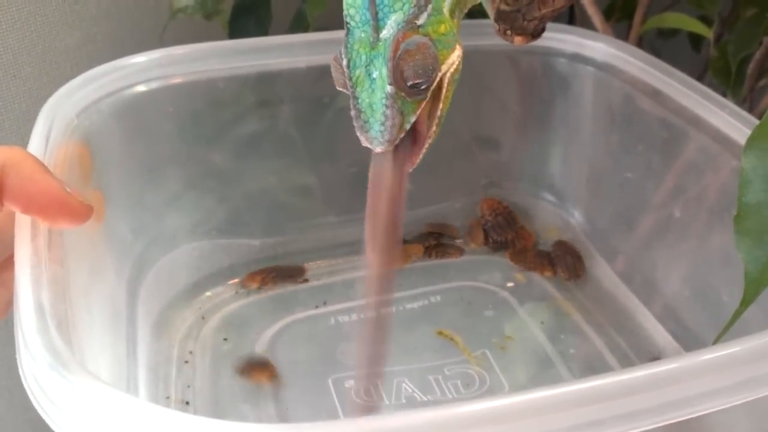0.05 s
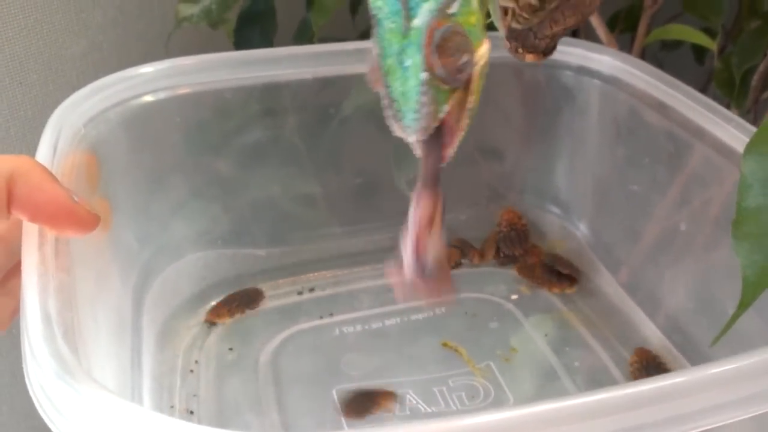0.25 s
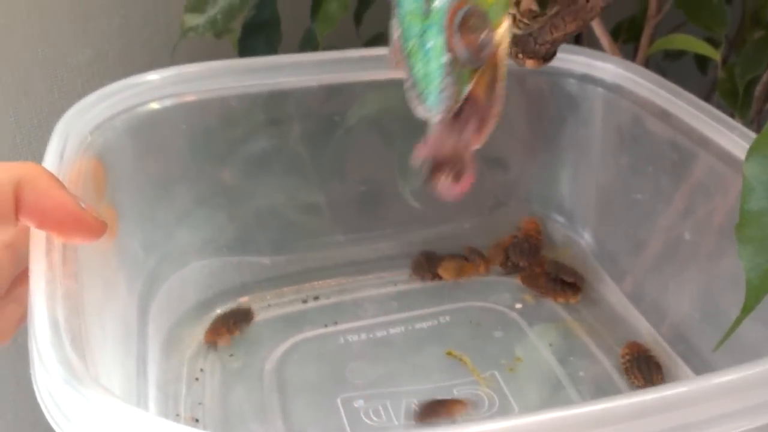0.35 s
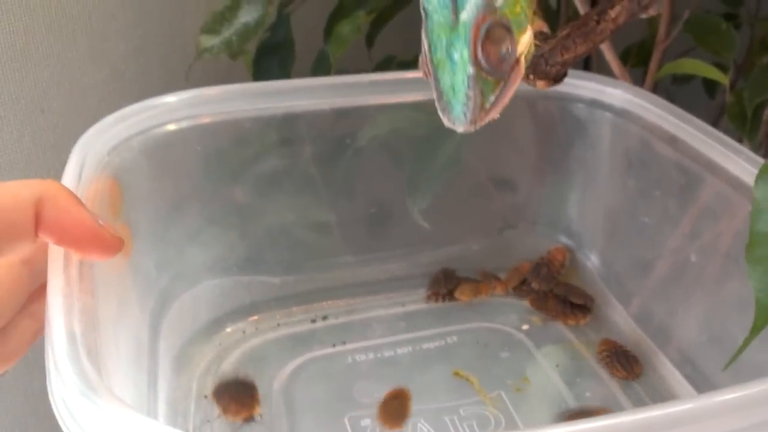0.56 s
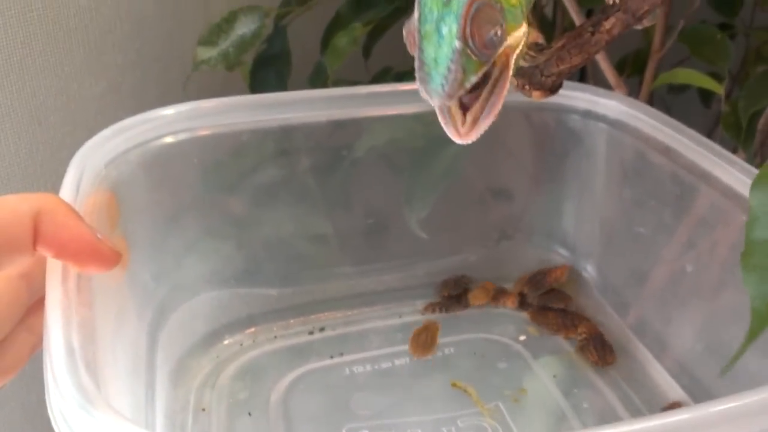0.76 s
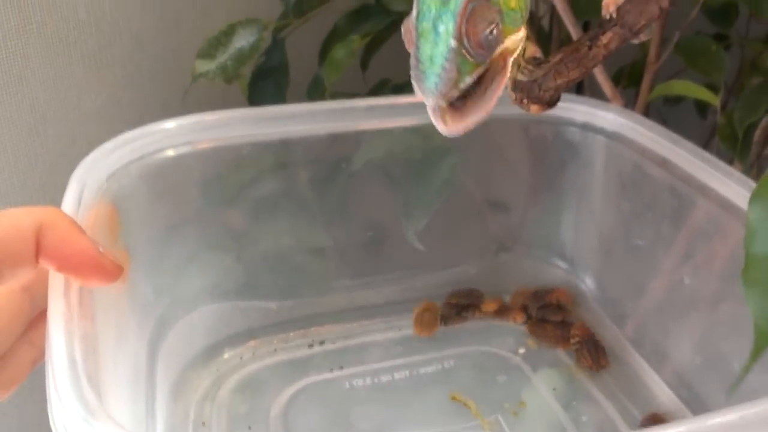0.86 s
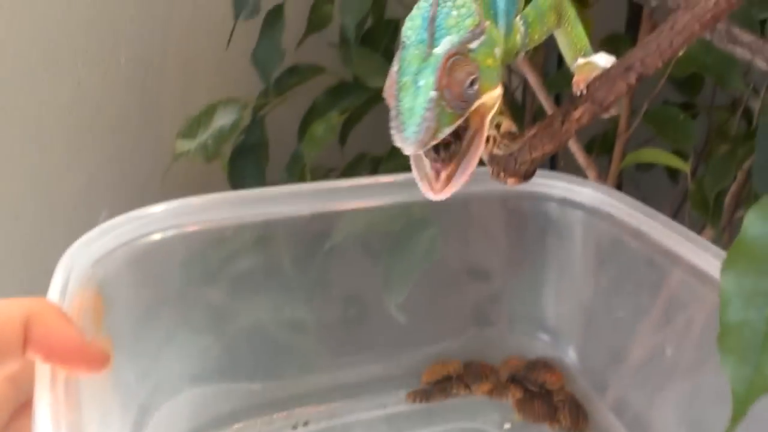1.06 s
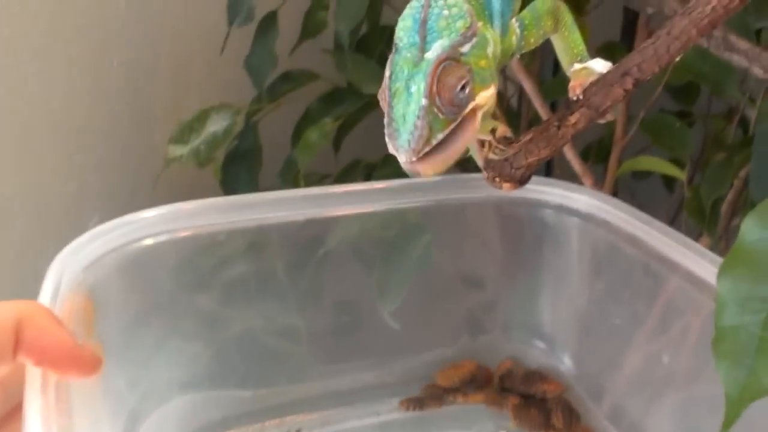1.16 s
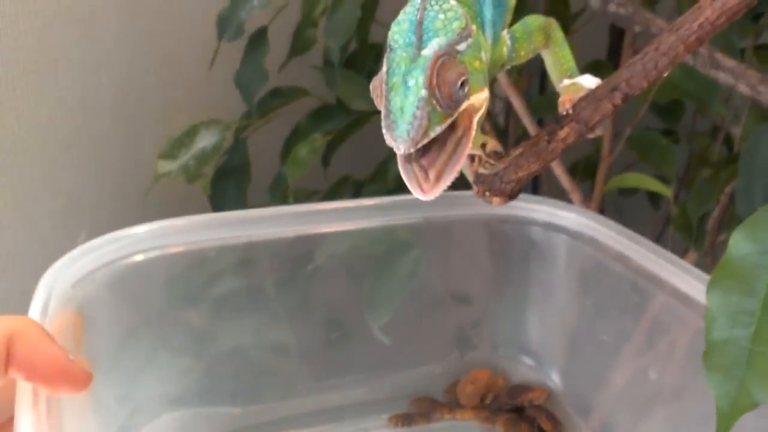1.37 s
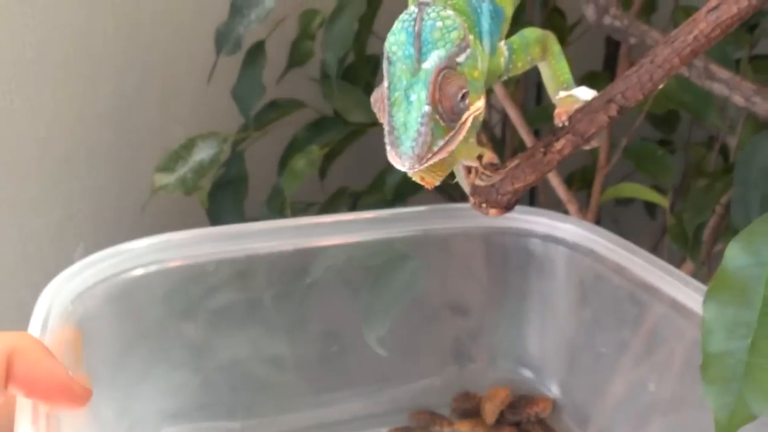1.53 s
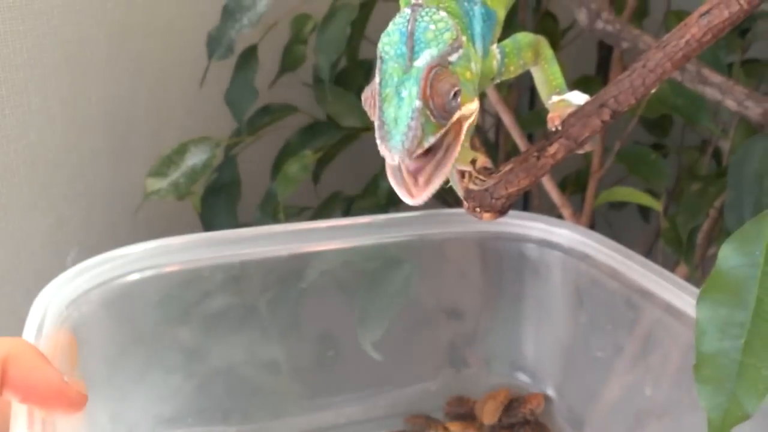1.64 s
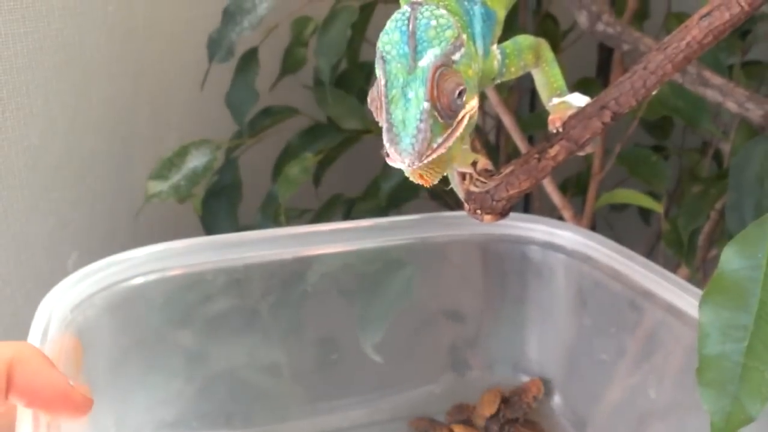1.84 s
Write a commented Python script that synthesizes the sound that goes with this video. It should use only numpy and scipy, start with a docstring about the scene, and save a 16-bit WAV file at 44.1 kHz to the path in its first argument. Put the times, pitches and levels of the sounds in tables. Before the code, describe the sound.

A sharp, wet smack comes at about 0.25 seconds as a chameleon's tongue hits a plastic tub close by, making it ring briefly. Soft, dull bumps on the tub follow, mostly around 0.7 to 1 second and again after 1.5 seconds. Insects scratch lightly on the plastic inside until the end, near 2 seconds. Throughout, faint crickets chirp high and fast over a quiet hum, rumble and hiss.

```python
"""A wet smack close to the microphone: a chameleon's tongue touches a hand-held plastic tub, lands
its full slap, and the tub rings. Soft bumps on the tub follow, and feeder insects scratch about
inside, their legs catching and slipping on the plastic. Farther off, two crickets chirp faintly,
wing scraping wing, over a low hum, rumble and hiss. Nearby walls answer briefly."""
import sys
import numpy as np
from scipy import signal
from scipy.fft import rfft, irfft, next_fast_len
from scipy.io import wavfile
from scipy.ndimage import map_coordinates

SR = 44100
rng = np.random.default_rng(int(sys.argv[2]) if len(sys.argv) > 2 else 0)


def wav_record(signal):
    """Record a signal, one row per channel, as 16-bit PCM in the file named by sys.argv[1]."""
    frames = np.transpose(np.atleast_2d(signal))
    bounded = np.clip(frames, -1, 1)
    # unit amplitude maps onto the largest positive 16-bit level
    quanta = np.round(bounded * 32767).astype(np.int16)
    wavfile.write(sys.argv[1], SR, quanta)


N = 83790

# the plastic tub's modes: f/Hz, level/dB, t60/s, left over right/dB
TUB_MODES = [(95.8, 1, 0.16, -8.5), (142.8, -6, 0.21, -4), (287.3, -10.5, 0.23, 3), (369, -11, 0.19, -4),
             (501.5, -1.5, 0.085, -4), (587, -2.5, .13, -3), (837, -6.5, 0.097, -2),
             (1017, -13, 0.072, -31), (1233, -11, 0.1, 10), (1360, 0, 0.065, -2), (2260, -11, 0.083, 0),
             (2970, -3.5, .1, -11), (3790, -4.5, 0.12, 9), (7560, -14, 0.033, 2)]
# stereo width of splats and knocks on the tub: f/Hz, side over mid/dB
TUB_WIDTH = [(100, -17), (500, -11), (1150, 1), (2200, -11.5), (4500, -21.5), (9500, -11.5)]
# stereo width of the background and the insects' crackle: f/Hz, side over mid/dB
AIR_WIDTH = [(60, -2), (340, -11), (1060, -1.5), (3300, -5), (10500, -2.5)]
ROOM_DB, CLICK_RISE_S = -4, 0.00033  # the walls' answer to the tub; attack of a sharp contact


def tongue():
    """Close up, the tip touches, slaps down and splats; the hardest contact rings the tub."""
    # the tongue's contacts: t/s, level/dB
    contacts = [(.2420, -6), (.2446, 0), (.2508, -9), (.2622, -16)]
    # modes of the struck patch of tub floor, quickly damped by the tongue: f/Hz, level/dB, t60/s
    patch_modes = [(1283, -18, 0.027), (3775, -7.5, 0.0053)]
    # spectrum of the splat: f/Hz, level/dB
    splat_spectrum = [(120, -3.5), (215, -17), (320, 1.5), (520, -4.5), (720, -8.5), (880, -3), (1250, -8),
                      (1750, -5), (2150, 1.5), (2700, -1.5), (3100, -5), (3850, -1.5), (4600, -5),
                      (5300, -17.5), (6300, -5.5), (6950, -33), (7600, -6.5), (8200, -20), (10500, -18)]
    # spectrum of the bright, wet click of first touch: f/Hz, level/dB
    click_spectrum = [(1500, -7.5), (5500, -2), (10500, -15.5)]
    ring_db, splat_db, click_db, wet_t60_s = -28.5, -18.5, -26.5, 0.029
    touch_s = contacts[0][0]
    slap_s = max(contacts, key=lambda row: row[1])[0]
    ring = sum(amp(ring_db + db) * pan(balance) * mode(slap_s, hz, rise=0.0039, t60=t60)
               for hz, db, t60, balance in TUB_MODES)
    patch = sum(amp(db) * mode(slap_s, hz, rise=0.00028, t60=t60) for hz, db, t60 in patch_modes)
    splat_envelope = sum(amp(splat_db + db) * burst(s, CLICK_RISE_S, wet_t60_s) for s, db in contacts)
    splat = noise(splat_spectrum, TUB_WIDTH) * splat_envelope
    click = amp(click_db) * noise(click_spectrum, TUB_WIDTH) * burst(touch_s, CLICK_RISE_S, wet_t60_s)
    return ring + patch + splat + click + amp(ROOM_DB) * room(splat + click)


def tub_bumps():
    """Each bump is a dull tap and a new mix of the tub's modes; a light rustle runs beneath."""
    # soft bumps on the tub: t/s, low ring level/dB, tap level/dB
    bumps = [(0.166, -51.5, -52), (0.348, -68, -48.5), (.532, -56, -56.5), (0.573, -76, -53.5),
             (.671, -60, -51), (0.737, -46, -52), (.774, -42, -49), (.802, -60, -63.5), (.836, -56.5, -56),
             (.897, -74, -55), (0.95, -84, -59), (1.04, -61.5, -50.5), (1.535, -58.5, -52),
             (1.651, -56.5, -57), (1.731, -54.5, -50.5)]
    # spectrum of the taps and the rustle: f/Hz, level/dB
    tap_spectrum = [(400, -12), (700, -8.5), (870, 0.5), (1020, -8.5), (1250, -2), (1550, -11), (1850, -7),
                    (3000, -23.5)]
    # soft rustle in the tub: t/s, level/dB
    rustle_levels = [(0, -71.5), (.6, -81.5), (.8, -74), (1.05, -71), (1.2, -80.5), (1.5, -83), (1.7, -76),
                     (1.9, -74)]
    thud_hz, tap_hz, rise_s = 385.3, 974, 0.0018

    def reach(hz, thud_db, tap_db):
        """How hard a bump drives a mode: its thud reaches the low ones, its tap the middle ones."""
        low = amp(thud_db + 5.5) * bell(hz, thud_hz, octaves=0.24)
        middle = amp(tap_db + 4) * bell(hz, tap_hz, octaves=0.25)
        return low + middle

    rings = sum(amp(db + 2 * rng.standard_normal()) * reach(hz, thud_db, tap_db) * mode(s, hz, rise_s, t60)
                for s, thud_db, tap_db in bumps
                for hz, db, t60, _ in TUB_MODES if thud_hz / 2 < hz < 2 * tap_hz)
    rustle = amp(np.interp(clock(), *np.transpose(rustle_levels)) + 2.4 * wobble(66))
    taps = sum(amp(db - 1) * burst(s, rise_s, t60=0.039) for s, _, db in bumps)
    knocks = noise(tap_spectrum, TUB_WIDTH) * (rustle + taps)
    return rings + knocks + amp(ROOM_DB) * room(knocks)


def insects():
    """Inside the tub, legs catch and slip on plastic: a few pitched scratches among faint ticks."""
    # leg scratches: t/s, level/dB, f/Hz, fine crackle level/dB
    scratches = [(0.046, -83, 3000, -60), (.352, -53.5, 3840, -54), (.671, -58, 4100, -67),
                 (.778, -61, 2350, -81), (.822, -59.5, 2360, -80.5), (.853, -59.5, 2690, -83),
                 (.931, -64, 3810, -53), (0.959, -63, 2960, -50), (1.075, -56, 3970, -56),
                 (1.203, -56, 3040, -58), (1.331, -56, 3760, -62), (1.611, -50, 2890, -52.5),
                 (1.651, -53.5, 2800, -79), (1.713, -59, 3670, -56.5), (1.733, -57, 2500, -80),
                 (1.849, -53, 3150, -67)]
    # spectrum of the crackle and ticks: f/Hz, level/dB
    crackle_spectrum = [(1200, -29), (3000, 11), (5000, -19), (8000, 2), (10500, -17.5)]
    steps_per_s, step_db = 25, -67
    stroke = lambda s: burst(s, rise=0.0027, t60=0.052)
    scrape = lambda pitch: unit(filtered(rng.standard_normal(N), lambda hz: bell(hz, pitch, 0.18)))
    pitched = sum(amp(db) * stroke(s) * scrape(pitch) for s, db, pitch, _ in scratches)
    crackle = sum(amp(db) * stroke(s) for s, _, _, db in scratches)
    steps = (rng.random(N) < steps_per_s / SR) * amp(step_db + 3 * rng.standard_normal(N))
    ticks = signal.fftconvolve(steps, burst(0, CLICK_RISE_S, t60=0.03))[:N]
    legs = pitched + (crackle + ticks) * noise(crackle_spectrum, AIR_WIDTH)
    legs *= unit(amp(2.1 * wobble(500)))  # a fast flicker roughens the level
    return legs + amp(ROOM_DB) * room(legs)


def crickets():
    """The nearer cricket chirps in three wing strokes; the farther is lower, slower and blurred."""
    # the nearer cricket's chirps: t/s of the main stroke, level/dB
    chirps = [(.046, 2), (0.147, 1), (0.252, 0), (.354, 3), (.456, -4), (.557, 0.5), (0.659, -4),
              (0.758, -4.5), (0.853, -1), (0.954, -2), (1.061, 0), (1.163, -2), (1.265, -2.5), (1.369, 0),
              (1.474, -2), (1.572, -1), (1.669, -0.5), (1.774, -1.5), (1.879, -2)]
    # wing strokes of one chirp: t/s from the main one, level/dB, half-length/s
    wing_strokes = [(-.017, -6, 0.0027), (0, -1, 0.0021), (0.013, -13, 0.0046)]
    near_hz, near_db = 6226, -50
    far_hz, far_db, far_period_s = 5450, -68, 0.1125
    t = clock()
    swell = lambda s, half: np.exp(-.5 * ((t - s) / half) ** 2)
    near_chirps = sum(amp(db + stroke_db) * swell(s + lag, half)
                      for s, db in chirps for lag, stroke_db, half in wing_strokes)
    far_chirps = sum(swell(s, half=0.012) for s in np.arange(0.046, t[-1], far_period_s))
    near = amp(near_db) * near_chirps * rasp(near_hz)
    far = amp(far_db) * far_chirps * rasp(far_hz)
    return near + far + amp(-1) * room(near + far)


def rasp(hz, spread_hz=180):
    """A tone of rms 1 whose pitch jitters as one wing scrapes the other."""
    pitch = hz + spread_hz * wobble(800)
    return unit(np.sin(2 * np.pi * np.cumsum(pitch) / SR))


def background():
    """Room tone: steady soft hiss, a low rumble and a wavering hum to the microphone's right."""
    # spectrum of the hiss: f/Hz, level/dB
    hiss_spectrum = [(25, -9.5), (55, 8), (100, -3), (190, -8.5), (290, -6), (370, -8.5), (450, -8.5),
                     (700, -13.5), (860, -13.5), (1000, -14), (1600, -20), (2900, -18), (4800, -21.5),
                     (7000, -20), (10500, -24.5)]
    # spectrum of the rumble: f/Hz, level/dB
    rumble_spectrum = [(25, -17), (45, -27), (60, 20.5), (80, -4), (110, 19.5), (170, -43)]
    # the hum's rise and fall: t/s, level/dB
    hum_levels = [(0, -66.5), (.55, -64), (0.851, -67), (1.2, -65.5), (1.36, -80), (1.55, -69.5),
                  (1.852, -61)]
    hum_hz, hiss_db, rumble_db = 121, -60.5, -59.5
    hum_db = np.interp(clock(), *np.transpose(hum_levels)) + 2 * wobble(11.68)
    hum = amp(hum_db) * unit(np.sin(2 * np.pi * hum_hz * clock() + 0.53 * wobble(7.8)))
    hiss = amp(hiss_db) * noise(hiss_spectrum, AIR_WIDTH)
    rumble = amp(rumble_db) * noise(rumble_spectrum, AIR_WIDTH)
    return hiss + rumble + pan(-5.5) * hum


def room(x, delay_s=0.005):
    """The short answer of nearby walls; each frequency dies at its own speed."""
    # the room's decay: f/Hz, t60/s
    decay_times = [(100, 0.48), (700, 0.27), (2500, 0.22), (9000, 0.17)]
    # stereo width of the reflections: f/Hz, side over mid/dB
    room_width = [(100, -20), (1100, -24), (3500, -15), (10000, -10.5)]
    white = noise([(20, 0), (20000, 0)], room_width)[:, :SR // 2]
    hz, t, bands = signal.stft(white, SR, nperseg=256)
    decay = np.exp(-np.log(1000) * t / along(decay_times, hz)[:, None])
    tail = signal.istft(bands * decay, SR, nperseg=256)[1]
    tail = np.pad(tail / np.linalg.norm(tail[0]), ((0, 0), (int(delay_s * SR), 0)))
    return signal.fftconvolve(np.atleast_2d(x), tail, axes=1)[:, :N]


def amp(db):
    """Decibels to gain."""
    return 10 ** (np.asarray(db) / 20)


def unit(x):
    """Scale to rms 1."""
    return x / np.sqrt(np.mean(x ** 2) + 1e-20)


def along(points, hz):
    """Interpolate (f/Hz, value) points on a log frequency axis."""
    f, v = np.transpose(points)
    return np.interp(np.log(hz + 1), np.log(f + 1), v)


def bell(hz, centre_hz, octaves):
    """A smooth peak around one frequency."""
    return np.exp(-.5 * (np.log2((hz + 1) / centre_hz) / octaves) ** 2)


def clock():
    """The time of every sample in seconds."""
    return np.arange(N) / SR


def wobble(rate):
    """A smooth random curve, rate knots a second."""
    return map_coordinates(rng.standard_normal(int(N * rate / SR) + 4), [clock() * rate])


def filtered(x, response):
    """Filter x by a gain given as a function of frequency."""
    size = next_fast_len(N + SR // 2)
    return irfft(rfft(x, size) * response(np.fft.rfftfreq(size, 1 / SR)), size)[..., :N]


def noise(spectrum, width):
    """Coloured stereo noise of rms 1."""
    mid, side = filtered(rng.standard_normal((2, N)), lambda hz: amp(along(spectrum, hz)))
    side = filtered(side, lambda hz: amp(along(width, hz)))
    return unit(np.array([mid + side, mid - side]))


def pan(db):
    """Channel gains that put left db above right."""
    return amp(np.array([[db], [-db]]) / 2)


def burst(s, rise, t60):
    """An envelope that rises at time s and dies away."""
    t = np.maximum(clock() - s, 0)
    return (1 - np.exp(-t / rise)) * np.exp(-np.log(1000) * t / t60)


def mode(s, hz, rise, t60):
    """One damped vibration set off at time s."""
    return burst(s, rise, t60) * np.sin(2 * np.pi * hz * (clock() - s))


def scene():
    """Everything at the microphone: the tub and its insects close by, the crickets farther off."""
    return tongue() + tub_bumps() + insects() + crickets() + background()


def record(dry):
    """The recorder thins the deepest bass and keeps nothing above its band limit."""
    low_cut_hz, top_hz = 30, 10600
    thinned = signal.sosfilt(signal.butter(2, low_cut_hz, 'high', fs=SR, output='sos'), dry)
    return filtered(thinned, lambda hz: hz < top_hz)


dry = scene()
out = record(dry)
wav_record(out)
```